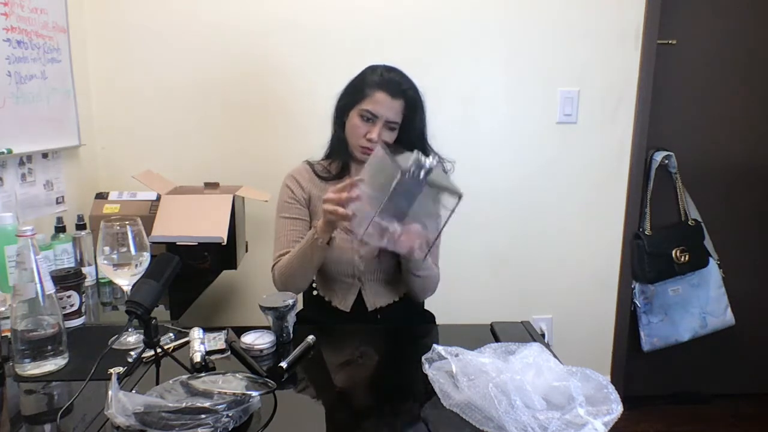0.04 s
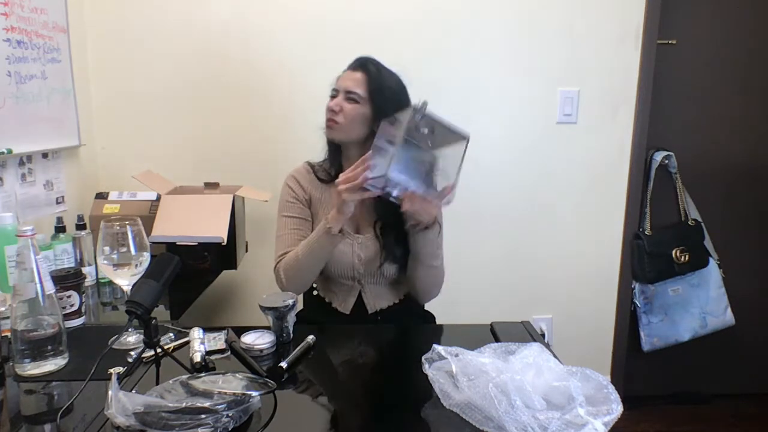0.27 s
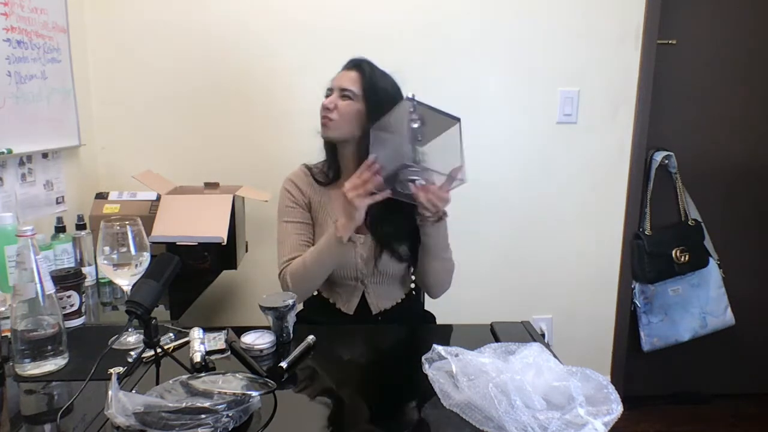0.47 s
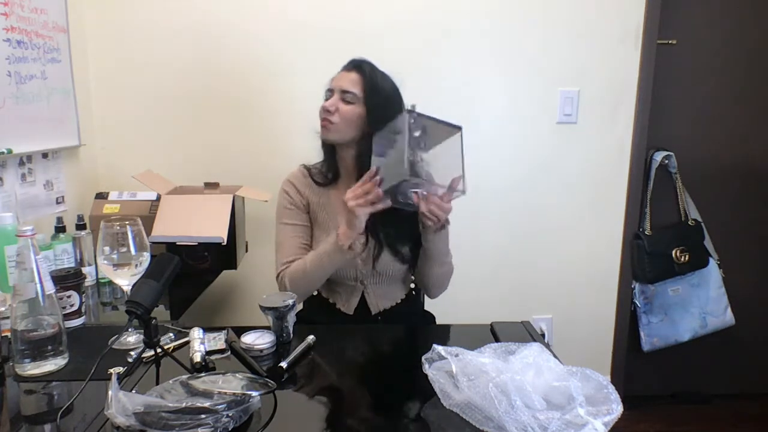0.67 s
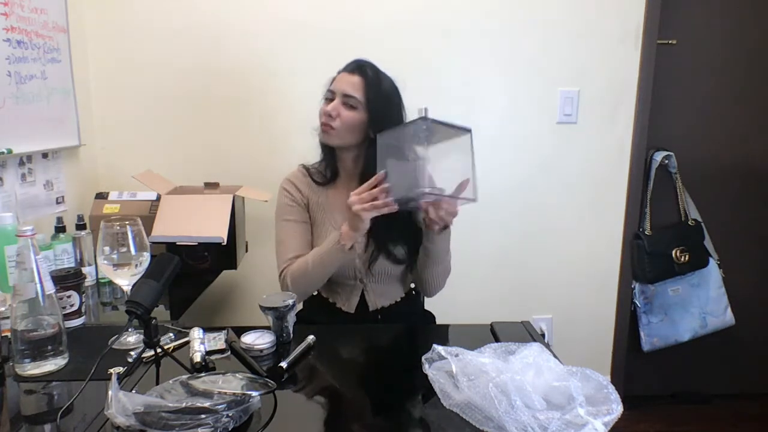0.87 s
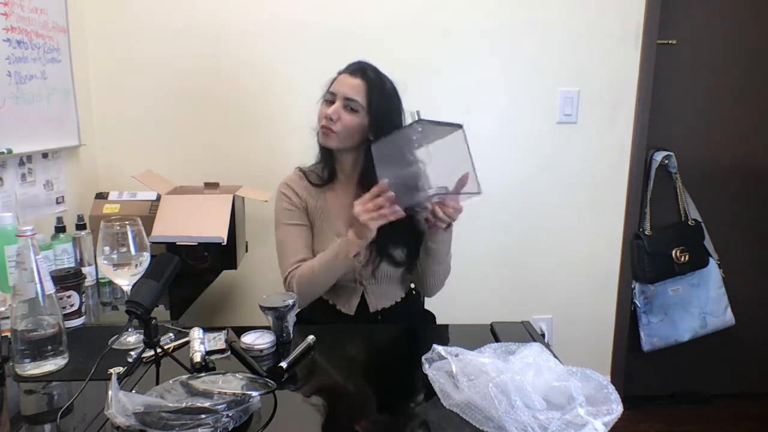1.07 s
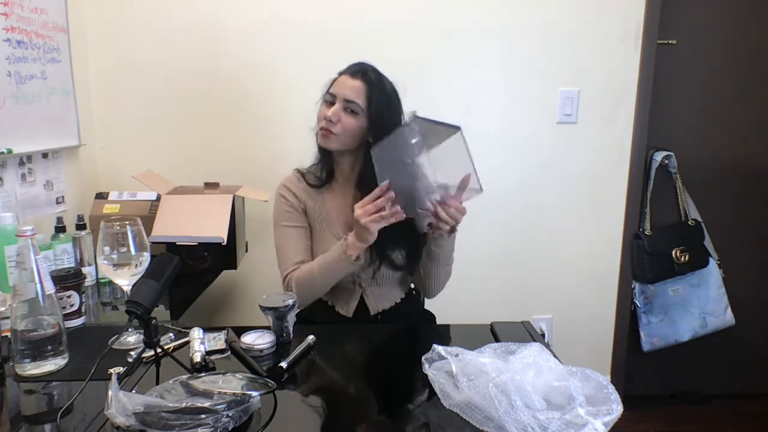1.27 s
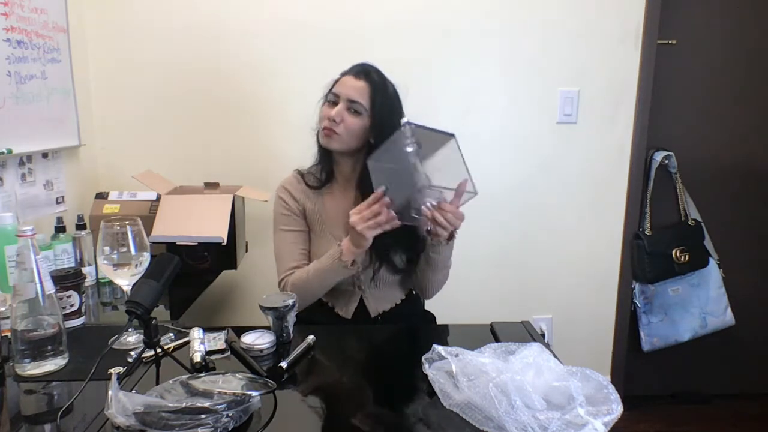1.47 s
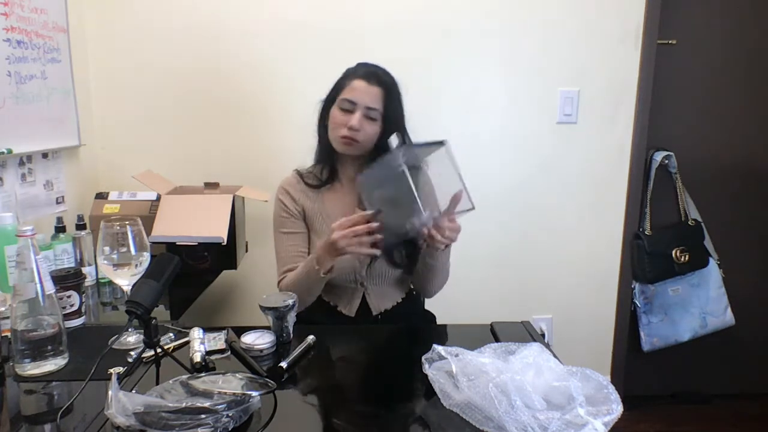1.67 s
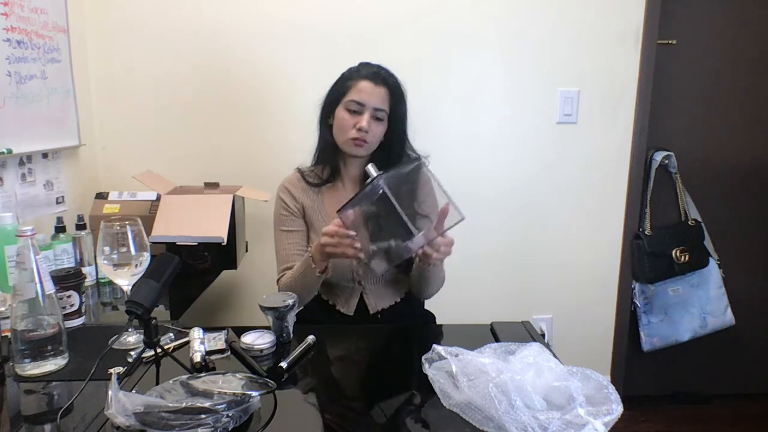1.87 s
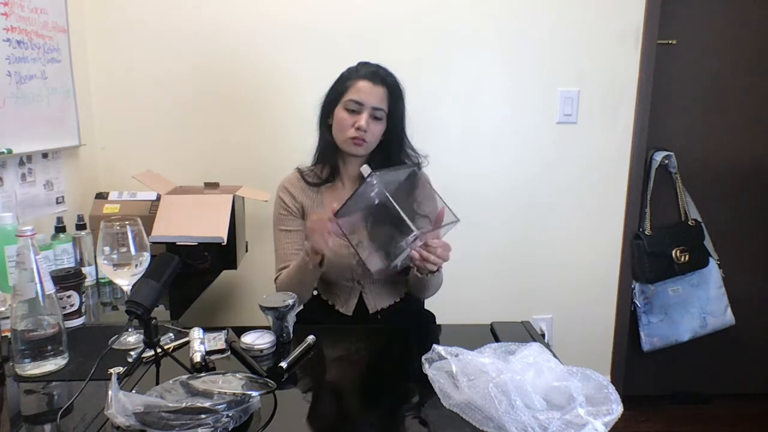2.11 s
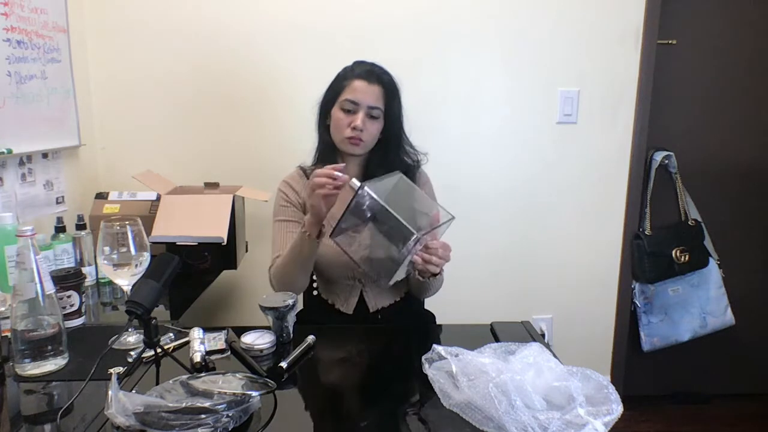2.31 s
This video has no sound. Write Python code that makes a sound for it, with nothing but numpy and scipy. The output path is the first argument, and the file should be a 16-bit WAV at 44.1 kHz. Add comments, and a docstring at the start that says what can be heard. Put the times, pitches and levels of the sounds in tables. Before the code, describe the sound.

A plastic box is shaken, loose hard bits clicking and clacking, then soft finger taps.

```python
"""A small room rumbles and hums; a fingertip and a nail touch a plastic box.
A few hard pieces are shaken inside it, about four strokes a second: they click against each other,
clack on the ringing walls and skitter between strokes. They settle as the box is turned,
leaving soft taps on the panels and a few nail ticks."""
import sys
import numpy as np
from scipy import signal
from scipy.fft import rfft, irfft, next_fast_len
from scipy.io import wavfile
from scipy.ndimage import uniform_filter1d

SR = 44100
rng = np.random.default_rng(int(sys.argv[2]) if len(sys.argv) > 2 else 0)


def dump(signal):
    """Clip the signal to [-1, 1] and save it as 16-bit WAV at the path in sys.argv[1]."""
    limited = np.clip(np.atleast_2d(signal).T, -1, 1)
    pcm = np.round(limited * 32767).astype(np.int16)
    wavfile.write(sys.argv[1], SR, pcm)


N = 108045
T = np.arange(N) / SR


def from_db(db):
    """Decibels to gain."""
    return 10 ** (np.asarray(db) / 20)


def unit_rms(x):
    """Scale to unit rms."""
    return x / np.sqrt(np.mean(x ** 2) + 1e-20)


def at_hz(points, hz):
    """Read a table on a log-frequency axis."""
    freqs, values = np.transpose(points)
    return np.interp(np.log(np.maximum(hz, 1)), np.log(freqs), values)


def decay(t, t60_s):
    """Exponential fall, 60 dB in t60_s."""
    return np.exp(-np.log(1000) * t / t60_s)


def colour(x, points):
    """Minimum-phase filter with the given spectral shape and unit power gain."""
    size = 2 * next_fast_len(N)
    gain = unit_rms(from_db(at_hz(points, np.arange(size // 2 + 1) * SR / size)))
    cepstrum = irfft(np.log(gain))
    cepstrum[1:size // 2] *= 2
    cepstrum[size // 2 + 1:] = 0
    return irfft(rfft(x, size) * np.exp(rfft(cepstrum)), size)[:N]


def add(out, start_s, sound):
    """Mix a sound in at start_s."""
    i = max(int(start_s * SR), 0)
    out[i:i + len(sound)] += sound[:max(N - i, 0)]


def ringing(modes, t):
    """Sum of decaying modes."""
    return sum(from_db(db) * np.sin(2 * np.pi * hz * t) * decay(t, t60_s) for hz, db, t60_s in modes)


def crack(envelope):
    """Noise burst that excites all frequencies about evenly."""
    burst = envelope * rng.standard_normal(len(envelope))
    flat = irfft(np.exp(1j * np.angle(rfft(burst))), len(envelope))
    local_rms = np.sqrt(np.abs(uniform_filter1d(flat ** 2, 24)) + 1e-18)
    return envelope * flat / local_rms


def contacts(hits, rise_s, t60_s, hard_db=-np.inf):
    """One crack per touch; below hard_db it glances and is drawn out."""
    out, t = np.zeros(N), T[:next_fast_len(SR // 8)]
    for start_s, db in hits:
        stretch = np.clip(np.exp(0.06 * (hard_db - db)), 1, 2)
        attack = np.minimum(t / (rise_s * stretch ** 2), 1)
        envelope = attack * decay(t, t60_s * stretch) / np.sqrt(stretch)
        add(out, start_s, from_db(db) * crack(envelope))
    return out


# Hum tones. Each row: frequency in Hz, rms level in dB, throb depth from 0 to 1.
HUM_TONES = [(93, -49.5, 0.1), (154.7, -50.5, 0.9)]
# Rumble contour. Each row: time in seconds, rms level in dB.
RUMBLE_LEVELS = [(0, -39), (.4, -39), (.7, -43), (1.1, -42), (1.4, -37.5), (1.7, -37.5), (1.88, -41),
                 (2.0, -37.5), (2.45, -38.5)]
# Rumble and hiss spectra. Each row: frequency in Hz, relative density in dB.
RUMBLE_SPECTRUM = [(20, -4), (30, -7.5), (55, 1.5), (85, -5.5), (105, -14), (125, -21), (200, -20),
                   (300, -32.5), (600, -50.5), (2000, -77.5)]
HISS_SPECTRUM = [(100, 3), (220, 8), (350, -4.5), (550, -8), (800, -13.5), (2000, -21), (6000, -29.5),
                 (15000, -31)]

def background(throb_hz=5.52, throb_peak_s=0.145, hiss_db=-55.5):
    """The room's throbbing hum, low rumble and faint hiss."""
    throb = np.cos(2 * np.pi * throb_hz * (T - throb_peak_s))
    hum = 0
    for hz, db, depth in HUM_TONES:
        tone = np.sin(2 * np.pi * (hz * T + rng.random()))
        hum += from_db(db) * unit_rms((1 + depth * throb) * tone)
    rumble_db = np.interp(T, *np.transpose(RUMBLE_LEVELS))
    rumble = unit_rms(colour(rng.standard_normal(N), RUMBLE_SPECTRUM))
    hiss = unit_rms(colour(rng.standard_normal(N), HISS_SPECTRUM))
    return hum + from_db(rumble_db) * rumble + from_db(hiss_db) * hiss


# Fingertip taps. Each row: start in seconds, relative level in dB.
FINGER_TAPS = [(.067, -46.5), (1.668, -44.5), (1.853, -45), (1.915, -50), (1.966, -52), (2.15, -51)]
# Panel modes. Each row: frequency in Hz, relative level in dB, T60 in seconds.
PANEL_MODES = [(460, -1.5, 0.03), (526, -1, 0.055), (664, -5, 0.04)]
# Fingertip drag. Each row: frequency in Hz, relative level in dB.
RUB_SPECTRUM = [(150, -19.5), (400, -14.5), (490, -3), (570, 1.5), (640, -13), (740, -35), (2000, -42),
                (8000, -52.5)]

def finger_taps(rise_s=0.012, detune=0.019):
    """Soft fingertips swell a panel's low modes, a little differently at each spot, and drag briefly."""
    thuds, t = np.zeros(N), T[:SR // 2]
    swell = np.minimum(t / rise_s, 1) ** 2
    for start_s, db in FINGER_TAPS:
        modes = [(hz * (1 + rng.normal(0, detune)), mode_db, t60_s) for hz, mode_db, t60_s in PANEL_MODES]
        add(thuds, start_s, from_db(db) * swell * ringing(modes, t))
    rub = colour(contacts(FINGER_TAPS, rise_s, t60_s=0.082), RUB_SPECTRUM)
    return from_db(5) * thuds + from_db(8.5) * rub


# Room decay. Each row: frequency in Hz, T60 in seconds.
ROOM_DECAY = [(400, 0.68), (2000, 0.36), (6000, 0.36), (10000, 0.35), (15000, 0.19)]

def room(x, patterns=6, move_s=0.09, build_s=0.0068, gain_db=-1.5):
    """Diffuse reflections, shortest in the treble; the moving box meets a new pattern every move_s."""
    t = T[:SR // 2]
    white = rfft(rng.standard_normal((patterns, len(t))))
    hz = np.arange(len(t) // 2 + 1) * SR / len(t)
    edges_hz = np.geomspace(100, 20000, 15)
    tails = 0
    for lo, hi in zip(edges_hz, edges_hz[1:]):
        band = irfft(white * (hz >= lo) * (hz < hi), len(t))
        tails += band * decay(t, at_hz(ROOM_DECAY, np.sqrt(lo * hi)))
    tails *= np.minimum(t / build_s, 1) ** 2
    tails *= 1 + from_db(6) * decay(t, t60_s=0.077)   # first reflections: table and near wall
    out = 0
    for k, tail in enumerate(tails):
        away = np.abs((T / move_s + k) % patterns - 1)
        crossfade = np.cos(np.pi / 2 * np.minimum(away, 1))
        out += signal.fftconvolve(x * crossfade, tail / np.sqrt(np.sum(tail ** 2)))[:N]
    return from_db(gain_db) * out


# Nail touches. Each row: start in seconds, relative level in dB.
NAIL_TICKS = [(0.121, -46.5), (0.191, -57), (2.276, -47.5), (2.333, -47), (2.391, -52)]
# Nail on plastic. Each row: frequency in Hz, relative level in dB.
NAIL_SPECTRUM = [(300, -10), (900, -24.5), (1600, -16), (1780, 7.5), (2050, -17.5), (2350, 1), (3400, -7.5),
                 (4150, 5.5), (5300, 0), (6100, -1.5), (7500, 4), (8700, 1), (11000, -4.5), (16000, -17)]

def nails(edge_db=20):
    """Nails tick on the hollow box as the grip changes; their hard edge favours its high modes."""
    ticks = colour(contacts(NAIL_TICKS, rise_s=0.0022, t60_s=0.072), NAIL_SPECTRUM)
    ring = box_ring([(start_s, db + edge_db, db) for start_s, db in NAIL_TICKS])
    return from_db(7.5) * ticks + from_db(1.5) * ring


# Box modes. Each row: frequency in Hz, relative level in dB, T60 in seconds.
BOX_MODES = [(457, -12, .16), (560, -13, .09), (688, -10, .13), (1780, -9, .16), (1960, -4, .09),
             (2236, -2, .11), (2400, -5, .1), (2798, -4, .13), (4155, -4, .08), (4590, -5, .08),
             (4830, -4, .08), (6020, 0, .09), (6150, -3, .08), (6645, -3, .1), (7208, -3, .09),
             (8215, -7, .07), (8750, -8, .07), (9548, -4, .08), (15200, -6, .05)]

def box_ring(hits, split_hz=3500, detune=0.005, spread_db=3.5):
    """Wall modes vary with the spot struck; clacks drive the low ones, clicks the high."""
    out, t = np.zeros(N), T[:SR // 6]
    for start_s, click_db, clack_db in hits:
        modes = []
        for hz, db, t60_s in BOX_MODES:
            drive_db = clack_db if hz < split_hz else click_db - 11
            modes.append((hz * (1 + rng.normal(0, detune)), db + rng.normal(drive_db, spread_db), t60_s))
        add(out, start_s, rng.choice([-1, 1]) * ringing(modes, t))
    return from_db(-14) * out


CONTACT_RISE_S, HARD_CLICK_DB, HARD_CLACK_DB = 0.00058, -16, -27
# Pieces landing; some rows are a fainter repeat of the hit about 11 ms before. Each row: start in seconds,
# relative click level in dB, relative clack level in dB.
LANDINGS = [(0.192, -64, -40), (0.2302, -24.5, -65), (.247, -21.5, -29), (.261, -20.5, -32.5),
            (.285, -21, -23.5), (0.295, -45, -38.5), (0.3311, -13.5, -31), (.345, -14.5, -42),
            (.405, -26.5, -31), (0.4363, -23, -32.5), (0.457, -25.5, -32), (.4928, -23.5, -30.5),
            (0.512, -32, -33.5), (.5440, -10, -33.5), (0.5525, -15, -45), (.591, -18, -41.5),
            (.600, -25, -40.5), (0.635, -42, -35.5), (.680, -27.5, -53), (.705, -24.5, -36),
            (0.716, -29, -32.5), (0.781, -44.5, -37.5), (0.7938, -16, -35), (0.796, -14, -35.5),
            (0.8039, -14, -48.5), (0.9028, -18.5, -33), (.921, -18, -46), (.937, -21, -32.5),
            (0.978, -19.5, -26.5), (1.034, -8, -33), (1.047, -13.5, -41.5), (1.1376, -20, -40),
            (1.152, -21, -37), (1.165, -24, -33), (1.184, -17, -25.5), (1.205, -20, -26.5),
            (1.22, -25, -26.5), (1.2845, -15, -28), (1.2875, -14.5, -32.5), (1.2955, -14, -32),
            (1.32, -20, -41), (1.3967, -27.5, -33), (1.4351, -17, -23.5), (1.459, -29.5, -27.5),
            (1.5442, -12, -34.5), (1.562, -18.5, -30.5), (1.5782, -18.5, -38.5), (1.611, -19, -31.5),
            (1.618, -19, -40), (1.7125, -25, -48), (1.735, -23.5, -38), (1.744, -25, -43.5)]
# Piece on piece (click) and on wall (clack). Each row: frequency in Hz, relative level in dB.
CLICK_SPECTRUM = [(800, -27.5), (2000, -12), (2700, -7.5), (3500, -9.5), (4150, 2), (4800, 4.5),
                  (5650, 0.5), (6050, 5.5), (6400, 0), (7100, 4.5), (7700, 1), (8500, 4.5), (9100, -1),
                  (9600, 5), (10800, -6), (12200, -2.5), (13700, -7.5), (15100, -2.5), (16500, -29)]
CLACK_SPECTRUM = [(200, -29.5), (380, -12.5), (470, 3), (680, 0.5), (770, -7.5), (1250, -2.5), (1550, -6),
                  (1950, 3.5), (2900, 1.5), (4500, 3), (9000, -17)]

def rattle():
    """Pieces click on each other and clack on the walls; pieces and box both ring."""
    sliding = skitter()
    click_hits = [(start_s, db) for start_s, db, _ in LANDINGS]
    clack_hits = [(start_s, db) for start_s, _, db in LANDINGS]
    sharp = contacts(click_hits, CONTACT_RISE_S, t60_s=0.019, hard_db=HARD_CLICK_DB)
    dull = contacts(clack_hits, CONTACT_RISE_S, t60_s=0.029, hard_db=HARD_CLACK_DB)
    clicks = colour(from_db(1) * sharp + from_db(-1) * sliding, CLICK_SPECTRUM)
    clacks = colour(from_db(1) * dull + from_db(-6) * sliding, CLACK_SPECTRUM)
    return clicks + clacks + piece_ring() + box_ring(LANDINGS)


def piece_ring(range_hz=(1100, 6000), count=5, t60_s=0.045):
    """Each collision sounds a few brief pitches of its own, set by the piece and the spot struck."""
    out, t = np.zeros(N), T[:SR // 12]
    attack = np.minimum(t / CONTACT_RISE_S, 1)
    for start_s, _, clack_db in LANDINGS:
        pitches_hz = np.exp(rng.uniform(*np.log(range_hz), count))
        add(out, start_s, attack * ringing([(hz, clack_db - 8, t60_s) for hz in pitches_hz], t))
    return out


# Skitter contour. Each row: time in seconds, relative level in dB.
SKITTER_LEVELS = [(.23, -41), (.29, -43), (.38, -48), (.48, -46.5), (.56, -50), (.66, -63), (.72, -51),
                  (.78, -61), (.87, -41), (.95, -41), (1.1, -49.5), (1.2, -38.5), (1.26, -44), (1.36, -43),
                  (1.46, -35), (1.53, -55), (1.62, -45), (1.74, -52), (1.78, -63)]

def skitter(touches_per_s=500, spread_db=4):
    """Small random impulses as the pieces slide across the box."""
    sizes = from_db(spread_db * np.minimum(rng.exponential(1, N), 3))
    signs = rng.choice([-1, 1], N)
    touching = rng.random(N) < touches_per_s / SR
    level_db = np.interp(T, *np.transpose(SKITTER_LEVELS), left=-np.inf, right=-np.inf)
    return from_db(level_db) * unit_rms(sizes * signs * touching)


# Snap of a hard landing. Each row: frequency in Hz, relative level in dB.
SNAP_SPECTRUM = [(3000, -31), (9000, -12), (12000, 1.5), (13700, -6), (15100, 4), (16500, -22.5)]

def snaps(growth_db_per_db=1.53):
    """The hardest landings make so brief a contact that they reach the top of the treble."""
    hits = [(start_s, HARD_CLICK_DB + growth_db_per_db * (click_db - HARD_CLICK_DB))
            for start_s, click_db, _ in LANDINGS]
    return from_db(-4.5) * colour(contacts(hits, CONTACT_RISE_S, t60_s=0.0093), SNAP_SPECTRUM)


def scene():
    """The box in its room, mono."""
    box = rattle() + nails()
    snap, taps = snaps(), finger_taps()
    reflections = room(box + 0.45 * snap + 0.35 * taps)
    return (box + snap + taps + reflections + background())[None]


def record(dry):
    """Soft peak limit, then a steep low-pass."""
    ceiling, stopband_hz = 0.9, 16900
    rounded = dry / (1 + (dry / ceiling) ** 4) ** (1 / 4)
    return signal.sosfilt(signal.cheby2(16, 60, stopband_hz, fs=SR, output="sos"), rounded)


dry = scene()
out = record(dry)
dump(out)
```